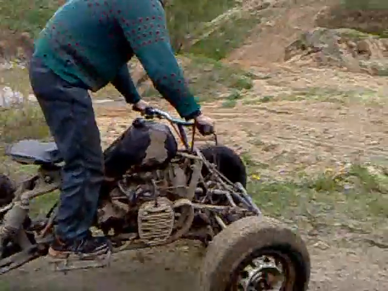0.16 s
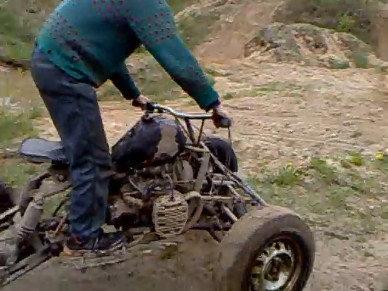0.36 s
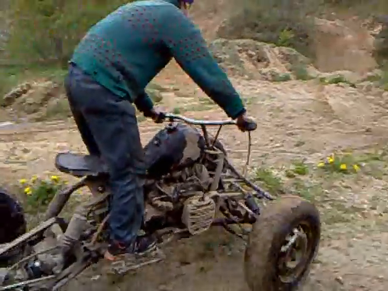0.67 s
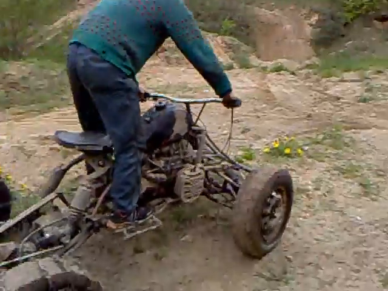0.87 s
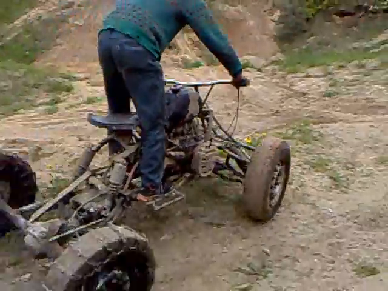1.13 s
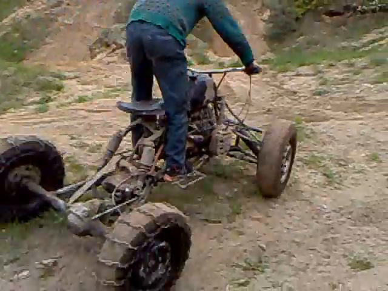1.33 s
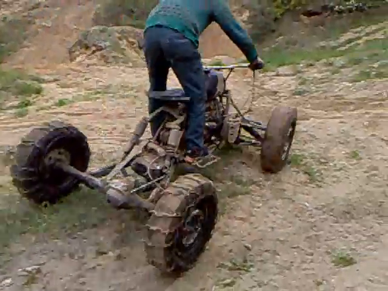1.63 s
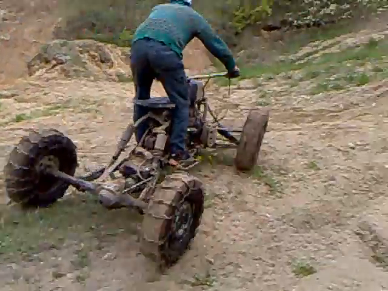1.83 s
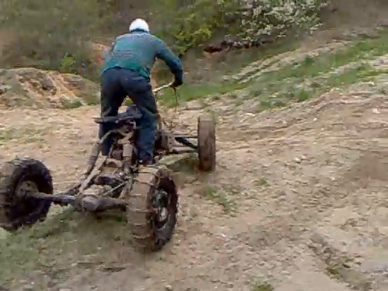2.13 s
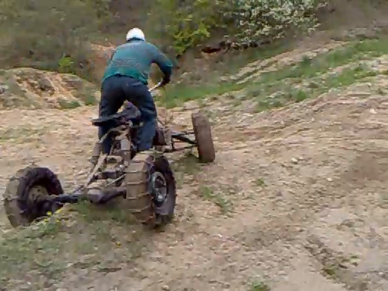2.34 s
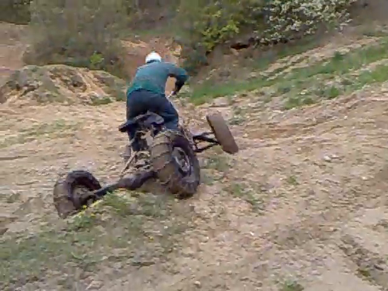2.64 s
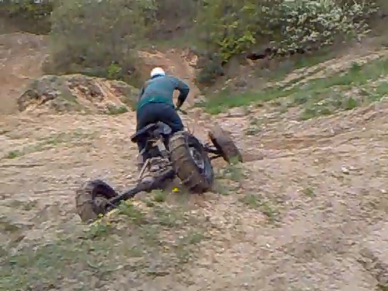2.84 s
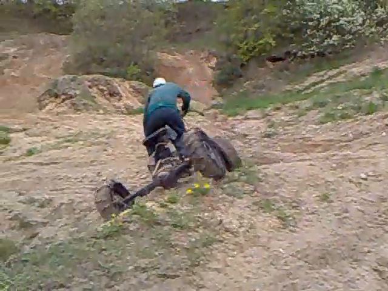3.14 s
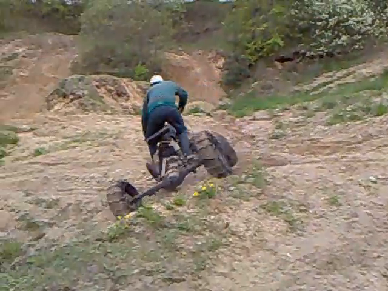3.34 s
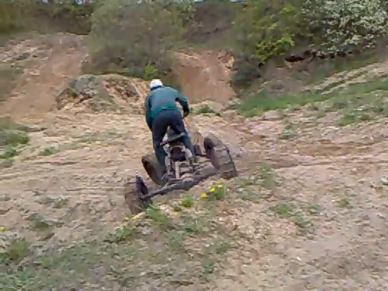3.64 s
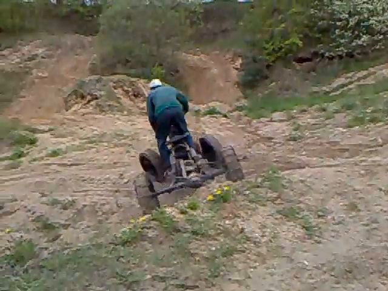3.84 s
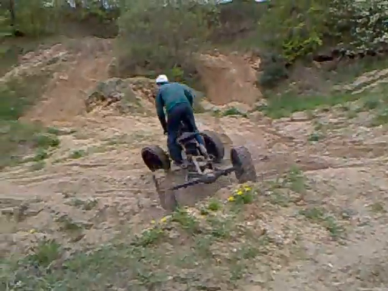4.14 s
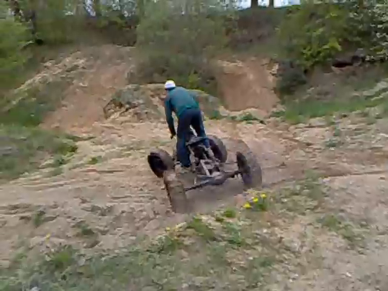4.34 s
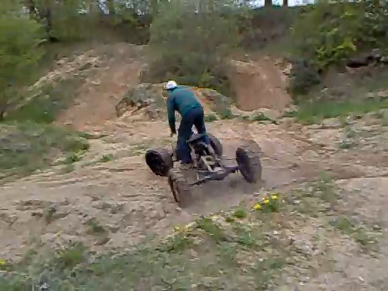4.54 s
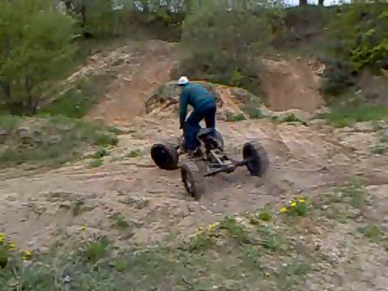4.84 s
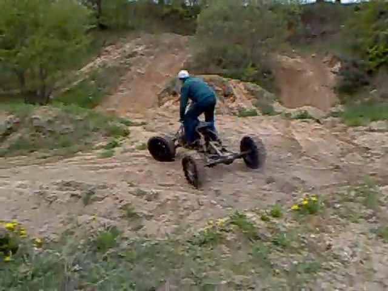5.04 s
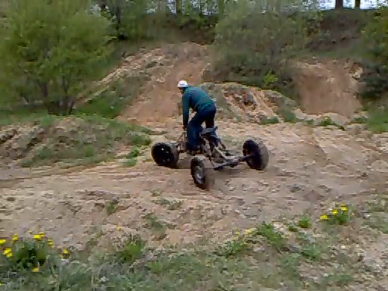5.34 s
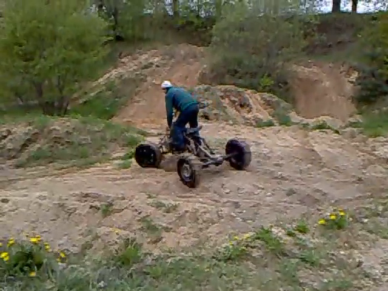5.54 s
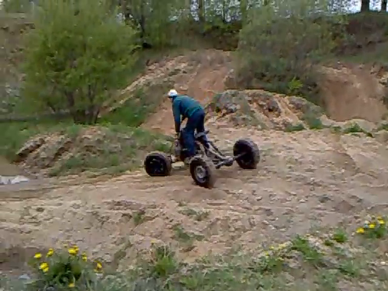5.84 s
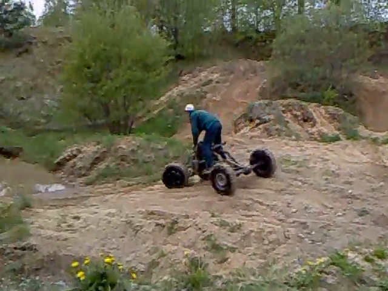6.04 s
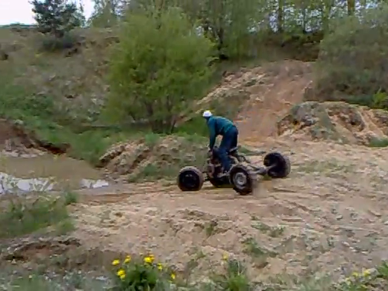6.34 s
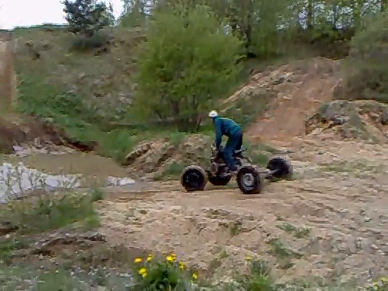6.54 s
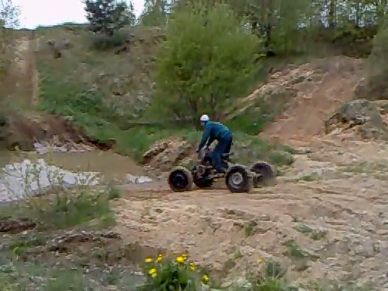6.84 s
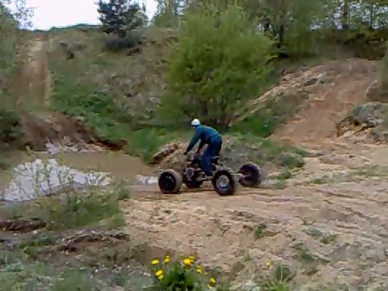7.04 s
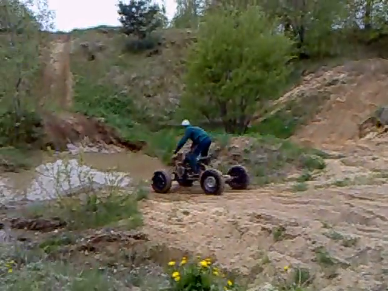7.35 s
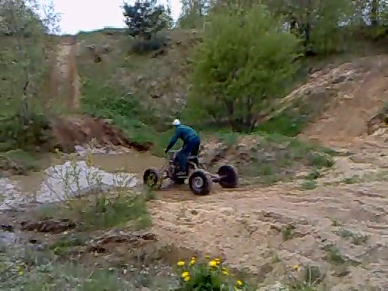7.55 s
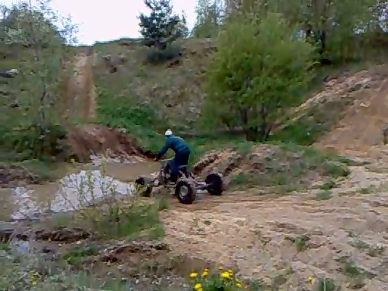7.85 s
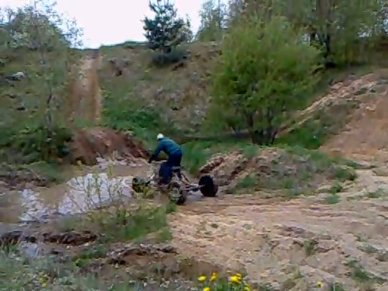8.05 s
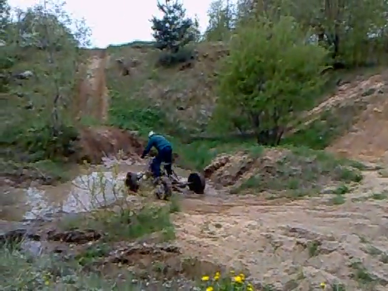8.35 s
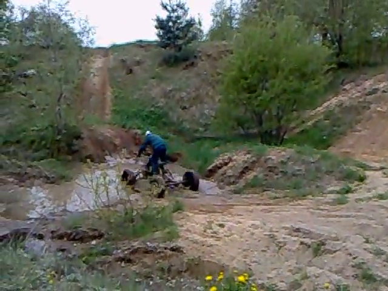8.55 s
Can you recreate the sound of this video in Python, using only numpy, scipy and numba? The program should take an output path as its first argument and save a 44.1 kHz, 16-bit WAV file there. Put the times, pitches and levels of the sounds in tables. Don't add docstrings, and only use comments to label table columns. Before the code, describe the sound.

A small rough twin-cylinder engine drives away across a sand pit. At first it is close: clattering valve gear, hissing intake and low puffing, with the first bark at 0.2 s and a tight volley from 0.35 to 0.6 s. Short, dry, ragged cracks with bassy thumps and hollow pipe ringing continue unevenly, with misfire gaps, until about 2.1 s. A lull around 2.4-2.7 s leaves one weaker pop; then the climb brings irregular, hissy barks from 2.75 to 5.1 s, densest after 4.3 s, with duller puffs between. The engine drops back, sparse and faint, near 5.5-6 s, then picks up into a distant regular run of pops peaking about 6.8 s. After 7 s it slows, leaving isolated cracks near 7.6, 7.9, 8.3 and 8.6 s over faint running noise. Short muffled echoes come from the banks; the small microphone lacks deep bass.

```python
import sys
import numpy as np
from scipy import signal
from scipy.fft import rfft, irfft, next_fast_len
from scipy.io import wavfile
from numba import njit

SR = 44100
rng = np.random.default_rng(int(sys.argv[2]) if len(sys.argv) > 2 else 0)


def dump_mix(stems):
    frames = np.atleast_2d(stems).T
    limited = np.clip(frames, -1, 1)
    pcm = np.round(limited * 32767).astype(np.int16)
    wavfile.write(sys.argv[1], SR, pcm)


def makeup_ratio(level_db):
    decades = np.asarray(level_db, float) / 20
    return 10 ** decades


N = 383229

# (time [s], exhaust strokes [per s])
CRANK_SPEED = [(0, 21), (.3, 18.5), (.6, 26), (.85, 21.5), (1.3, 23), (1.53, 19.6), (1.65, 23), (2, 24.5),
               (2.6, 17), (3, 24), (4, 25), (4.9, 28), (5.9, 15.5), (6.45, 20.5), (6.9, 25.5), (7.6, 18),
               (8.7, 13.5)]
# (time [s], running gear [dB], pumping of dead strokes [dB])
RUNNING_LEVELS = [(0, -38, -43.5), (.22, -43.5, -46), (.55, -41.5, -38), (.9, -42.5, -39.5),
                  (1.3, -44, -41.5), (1.58, -48.5, -45), (2.0, -47.5, -46), (2.42, -54, -51.5),
                  (2.74, -62.5, -63.5), (3.0, -53, -55), (3.5, -56, -52.5), (4.5, -55.5, -51.5),
                  (5.1, -57.5, -56), (5.9, -62.5, -57.5), (6.85, -51, -47.5), (7.38, -60.5, -63),
                  (8.2, -60.5, -60), (8.69, -61.5, -70)]
# (time [s], level of the blow [dB])
TAILPIPE_FACING = [(0, -17), (1.3, -1.5), (2, 3), (3, 5.5), (4, 1.5), (5, 3.5), (6, -6), (7, -6),
                   (8.69, -3.5)]
# (time [s], bark peak
# [dB], bark centre [Hz], pipe ring [dB re bark])
FIRED_STROKES = [(0.205, -6.5, 913, -21), (0.367, -6, 2270, -21), (0.411, 3, 1500, -24),
                 (0.454, -4, 2140, -17.5), (0.495, 1.5, 990, -25), (0.536, -4, 2330, -23),
                 (0.573, -3, 960, -21.5), (0.61, -7, 2200, -17), (0.818, -7, 900, -30),
                 (0.866, -2, 965, -19.5), (0.955, -0.5, 2120, -24), (1.048, -5.5, 960, -26),
                 (1.185, -6, 950, -19), (1.234, -4, 947, -12.5), (1.321, -3.5, 1900, -19),
                 (1.456, -13, 1750, -10.5), (1.607, -3.5, 950, -18), (1.651, -7.5, 2630, -14.5),
                 (1.696, -5.5, 2270, -19), (1.78, -5, 1190, -14.5), (1.823, -5, 1750, -15.5),
                 (1.865, -7.5, 2350, -14), (1.952, -4, 1724, -19), (1.993, -2, 2330, -17.5),
                 (2.034, -3, 1820, -23), (2.115, -2.5, 835, -22.5), (2.35, -12.5, 2170, -18),
                 (2.75, -13, 2190, -21), (2.804, -14, 890, -15), (2.856, -16.5, 1040, -13.5),
            (2.948, -15.5, 990, -23), (2.99, -7.5, 2020, -24), (3.034, -25, 940, -26),
            (3.12, -7.5, 2000, -24), (3.368, -11, 2180, -26), (3.53, -9.5, 2445, -20.5),
            (3.7, -4.5, 2110, -23), (3.831, -21, 1480, -17), (3.872, -16.5, 2230, -18.5),
            (3.997, -31.5, 935, -15), (4.037, -13.5, 2040, -24), (4.153, -19.5, 1320, -16),
            (4.192, -10, 1710, -24), (4.349, -10.5, 2280, -32), (4.424, -7.5, 2100, -31),
            (4.582, -11, 2010, -36), (4.659, -11, 1550, -25), (4.734, -5.5, 2290, -29),
            (4.772, -11, 1060, -26), (4.807, -9.5, 1460, -39), (4.878, -9, 2000, -41),
            (4.95, -8.5, 2550, -32), (5.033, -31, 1880, -22), (5.138, -12.5, 2060, -17),
                 (5.453, -34, 1860, -28), (5.603, -23, 1420, -11.5), (5.846, -26.5, 1520, -16),
               (5.908, -23.5, 1370, -18.5), (6.04, -25, 1540, -17.5), (6.101, -19, 1940, -19),
               (6.154, -18.5, 1940, -20), (6.266, -21.5, 2010, -20), (6.369, -23.5, 940, -30),
               (6.471, -17, 2130, -30), (6.566, -17.5, 2020, -32), (6.653, -15, 2000, -23),
               (6.737, -16, 1990, -16.5), (6.817, -10.5, 2070, -21), (6.897, -16, 2230, -17),
               (6.977, -14.5, 1495, -28), (7.591, -21, 1710, -12), (7.933, -20, 1850, -11),
               (8.321, -24.5, 2050, -12), (8.603, -33, 1520, -14)]
FIRED = FIRED_STROKES
# (time [s], peak [dB])
FAINT_BURSTS = [(1.102, -31), (1.278, -18.5), (1.375, -30), (2.4, -41), (3.196, -33.5), (3.323, -37.5),
                (3.583, -31.5), (3.626, -39), (3.756, -32), (4.242, -31), (4.459, -43), (4.501, -29.5),
                (4.54, -55), (4.925, -26.5), (4.997, -26.5), (5.071, -36.5), (5.107, -32), (5.189, -32),
                (5.233, -33.5), (5.272, -36.5), (5.319, -43), (5.476, -41.5), (7.032, -38), (7.073, -36),
                (7.113, -47), (7.155, -42), (8.038, -38.5), (8.083, -36.5)]
# (frequency [Hz], level [dB per Hz])
JET_COLOUR = [(88, 24.5), (150, 6), (457, -6), (1020, -5.5), (1790, -7.5), (2180, -5.5), (3490, -15.5),
              (4320, -25.5), (5460, -21.5), (7320, -23), (9440, -35.5), (16000, -42.5)]
# (frequency [Hz], level [dB per Hz])
CLATTER_COLOUR = [(120, -18), (200, -6.5), (320, -1), (450, -7), (640, 0), (900, -9), (2000, -8.5),
                  (3200, -12.5), (4200, -23.5), (6000, -39)]
# (frequency [Hz], level [dB per Hz])
INTAKE_COLOUR = [(3000, -43), (4300, -3), (5300, 4), (6500, -5), (7800, -2.5), (9000, -16), (12000, -29),
                 (16000, -35)]
# (frequency [Hz], width [Hz], level [dB])
CASTING_MODES = [(648, 16, -27), (1520., 69, -19.5), (1940., 9, -18)]
# (frequency [Hz], level [dB])
PIPE_OVERTONES = [(325., -10.5), (643., -5), (972., -4), (1310., -14.5), (1600., -10), (1943., -8)]
# (delay [s], level [dB])
PIPE_RETURNS = [(.012, -9), (.021, -10.5)]
# (delay [s], level [dB])
WALL_ECHOES = [
    (0.018, -15.5),
    (.053, -26),
    (.081, -25),
    (.12, -28),
]

SHAKE_S, SHAKE_CLATTER_DB, SHAKE_HUM_DB, SHAKE_PUMP_DB = 0.081, 3.85, 5, 0.27
GEAR_REFERENCE_DB = -48
HUM_DB, HUM_FOLLOWS, INTAKE_DB, INTAKE_FOLLOWS = -58.5, 1.35, -52.5, 1
SIDE_ON = -0.56
THUMP_DB, THUMP_FROM_BARK, THUMP_FROM_PUMP = -4.5, 0.33, 0.41
SLUG_DB, SLUG_S, RING_LAG_S, WALL_BASS_DB = 8, .0052, .0025, -15.5
USUAL_EXCESS_DB = 40
HISS_DB, HISS_PER_EXCESS = -19, -0.37
FALL_MS, FALL_PER_EXCESS, FALL_SCATTER = 3.2, -0.051, .25
DULL_DB = -7 + 15 - 15
STRAY_HZ, STRAY_DB = 1792, -14
NEAR_CENTRE_DB, CENTRE_SPREAD, RESTED_DB, REST_S = 8.5, .1, 8, 0.32
WAVER_DB, RING_SCATTER_DB = 2.5, 1.2
PIT_T60_S, PIT_DB = 0.93, -27.5


def rms_one(x):
    return x / np.sqrt(np.mean(x ** 2) + 1e-20)


def in_time(rows):
    s, *columns = np.transpose(rows)
    return [np.interp(np.arange(N) / SR, s, c) for c in columns]


def drift(rate):
    count = int(N / SR * rate) + 2
    return np.interp(np.arange(N), np.linspace(0, N, count), rng.standard_normal(count))


def coloured(x, spectrum):
    hz, db = np.transpose(spectrum)
    size = next_fast_len(len(x))
    grid = np.maximum(np.fft.rfftfreq(size, 1 / SR), 1)
    gain = makeup_ratio(np.interp(np.log(grid), np.log(hz), db))
    return rms_one(irfft(rfft(x, size) * gain, size)[:len(x)])


def cut(x, hz, kind, order=2):
    return signal.sosfilt(signal.butter(order, hz, kind, fs=SR, output="sos"), x)


def ring(clicks, hz, t60):
    r, w = makeup_ratio(-60 / (t60 * SR)), 2 * np.pi * hz / SR
    return signal.lfilter([0, np.sin(w)], [1, -2 * r * np.cos(w), r * r], clicks + 1e-18)


def clicks_at(seconds, sizes):
    out = np.zeros(N)
    out[np.clip((seconds * SR).astype(int), 0, N - 1)] = sizes
    return out


@njit
def gliding(x, turn):
    out, state = np.zeros(len(x)), 0j
    for i in range(len(x)):
        state = state * turn[i] + x[i]
        out[i] = state.real
    return out


def crank(lead_s):
    turned = np.cumsum(in_time(CRANK_SPEED)[0]) / SR
    fired_at = turned[((np.array(FIRED)[:, 0] - lead_s) * SR).astype(int)]
    whole = np.cumsum(np.r_[5, np.maximum(np.round(np.diff(fired_at)), 1)])
    known = np.r_[fired_at[0] - 5, fired_at, fired_at[-1] + 5]
    return np.interp(turned, known, np.r_[0, whole, whole[-1] + 5])


def shaking():
    r = np.exp(-1 / (SHAKE_S * SR))
    return signal.lfilter([1], [1, -r], clicks_at(np.transpose(FIRED)[0], 1))


def gas_bounce(strokes, open_hz=54.0, shut_hz=118.3, rise=0.38, t60=0.23):
    part = strokes % 1
    warmth = 1 + .06 * rng.standard_normal(400)[strokes.astype(int)]
    hz = warmth * (shut_hz - (shut_hz - open_hz) * np.exp(-part / rise))
    loss = 1 + 12 * part ** 12
    return makeup_ratio(-60 * loss / (t60 * SR)) * np.exp(2j * np.pi * hz / SR)


def valve_push(clicks):
    push = np.hanning(round(0.0067 * SR)) * 2 / round(0.0049 * SR)
    return np.convolve(clicks, push)[:N]


def dead_pumping(strokes, pump_db, bounce):
    opens = np.diff(np.floor(strokes), prepend=0) > 0
    shuts = np.diff(np.floor(strokes + .45), prepend=0) > 0
    dead = (opens - 0.66 * shuts) * makeup_ratio(pump_db + 14.5 + 2.0 * rng.standard_normal(N))
    return cut(cut(gliding(valve_push(dead), bounce), 140.0, "low"), 32.0, "high")


def clatter(strokes, level_db, hiss_db, ticks=2, pulse=0.23, knocks_per_s=520.0, knock_db=-8.0):
    swell = 1 - pulse + pulse * 1.2 * np.exp(-(strokes * ticks % 1) / 0.18)
    sizes = makeup_ratio(1.8 * np.minimum(rng.exponential(1, N), 4)) * rng.choice([-1, 1], N)
    knocks = rms_one(sizes * (rng.random(N) < knocks_per_s * swell / SR))
    grit = swell * rng.standard_normal(N) + makeup_ratio(knock_db) * knocks
    body = coloured(grit * makeup_ratio(3.15 * drift(120)), CLATTER_COLOUR)
    for hz, width, db in CASTING_MODES:
        flutter_db = 3 * drift(40)
        body = body + makeup_ratio(db + flutter_db) * rms_one(ring(grit, hz, 10.0 / width))
    hiss = coloured(swell ** 3.1 * rng.standard_normal(N), INTAKE_COLOUR)
    edges = [2500, 4700, 6000, 7200, 9000, 16000]
    hiss = sum(makeup_ratio(2 * drift(25)) * cut(hiss, pair, "band") for pair in zip(edges, edges[1:]))
    body = body / np.std(cut(body, [900, 4000], "band"))
    return makeup_ratio(level_db) * body + makeup_ratio(hiss_db + 1.0 * drift(30)) * hiss


def frame_hum(strokes, hum_db, hz=320.5):
    shake = rng.standard_normal(N) * (.6 + np.exp(-(strokes % 1) / .5))
    bent = hz * (1 + .03 * drift(12))
    turn = makeup_ratio(-60 / (.2 * SR)) * np.exp(2j * np.pi * bent / SR)
    hum = cut(gliding(shake, turn), [hz / 1.3, hz * 1.3], "band", order=1)
    return makeup_ratio(hum_db + 0.5) * rms_one(hum)


def fired_thump(pump_db, facing_db, bounce):
    s, bark_db = np.transpose(FIRED)[:2]
    low_db = THUMP_DB + THUMP_FROM_BARK * bark_db + THUMP_FROM_PUMP * pump_db[(s * SR).astype(int)]
    fired = clicks_at(s + 0.00019, makeup_ratio(low_db + 3.0))
    slug = np.convolve(fired, np.hanning(round(SLUG_S * SR)))[:N]
    slug = slug + sum(makeup_ratio(db) * np.roll(slug, round(lag * SR)) for lag, db in PIPE_RETURNS)
    front = makeup_ratio(SLUG_DB + facing_db) * cut(slug, 40., "high", order=1)
    ringing = gliding(np.roll(valve_push(fired), round(RING_LAG_S * SR)), bounce)
    blow = cut(makeup_ratio(-0.5) * cut(ringing, 170.0, "low"), 55.0, "high") + front
    lag = round(WALL_ECHOES[1][0] * SR)
    blow[lag:] += makeup_ratio(WALL_BASS_DB) * blow[:-lag].copy()
    return cut(blow, 32.0, "high")


def barks(facing_db, gear_db, tail_s=0.013, tail_db=-15.0, shrill_db=-5.5, ragged_db=2.0):
    size = 4096
    out = np.zeros(N + size)
    t = np.arange(size) / SR - .008
    after = np.maximum(t, 0)
    rise_s, shrill_s = .0013, .009
    jet = coloured(rng.standard_normal(N + size), JET_COLOUR)
    dull = cut(jet, [280., 600.], "band")
    body = cut(cut(jet, 523.0, "high"), 3740, "low", order=4)
    hiss = cut(jet, 4230, "high", order=4)
    lumps = makeup_ratio(ragged_db * drift(450))
    bursts = FIRED + [(s, peak_db, 2000., 0) for s, peak_db in FAINT_BURSTS]
    luck = rng.standard_normal((len(bursts), 3))
    for (s, peak_db, hz, _), (hissy, slow, stray) in zip(bursts, luck):
        i = round((s - .006) * SR)
        here = slice(i, i + size)
        excess = np.clip(peak_db - gear_db[i] - USUAL_EXCESS_DB, -10, 10)
        hiss_db = HISS_DB + HISS_PER_EXCESS * excess + 1.65 * hissy
        fall_ms = FALL_MS * np.exp(FALL_PER_EXCESS * excess + FALL_SCATTER * slow)
        fall = np.exp(-after * 1000 / max(fall_ms, .5)) + makeup_ratio(tail_db) * np.exp(-after / tail_s)
        ragged = np.resize(lumps[here], size) ** np.minimum(after / 0.01, 1)
        shape = np.exp(np.minimum(t, 0) / rise_s) * fall * ragged
        dull_gain = makeup_ratio(DULL_DB + 0.3 * facing_db[i])
        burst = shape * (dull_gain * dull[here] + body[here] + makeup_ratio(hiss_db + 20.5) * hiss[here])
        shrill = ring(shape * rng.standard_normal(size), hz, shrill_s)
        stray_hz = STRAY_HZ * 2 ** (stray / 3)
        shrill += makeup_ratio(STRAY_DB) * ring(shape * jet[here][::-1] * 3, stray_hz, shrill_s * 1.7)
        shrill_gain = makeup_ratio(shrill_db + .6 * facing_db[i] + 3.5)
        burst += shrill_gain * shrill * np.std(burst) / np.std(shrill)
        out[here] += makeup_ratio(peak_db) * burst / np.abs(burst).max()
    return out[:N]


def pipe_rings(facing_db, t60=0.14, swell_s=0.001, detune=0.023):
    out, t = np.zeros(N + 8192), np.arange(6144) / SR
    waver = makeup_ratio(WAVER_DB * drift(120))
    hz, db = np.transpose(PIPE_OVERTONES)
    rests = np.diff(np.transpose(FIRED)[0], prepend=0)
    luck = rng.standard_normal((len(FIRED), 2, len(hz)))
    dying = makeup_ratio(-60 * t[:, None] / (t60 * (640 / hz) ** .5))
    swell = 1 - np.exp(-t / swell_s)
    for (s, bark_db, centre, ring_db), rest, (loud, warm) in zip(FIRED, rests, luck):
        nearness = np.exp(-(np.log(hz / centre) / CENTRE_SPREAD) ** 2)
        level = bark_db + ring_db + db + RING_SCATTER_DB * loud + NEAR_CENTRE_DB * nearness
        rested = min(rest / REST_S, 1)
        level[0] += SIDE_ON * facing_db[int(s * SR)]
        level[1] += RESTED_DB * rested
        level[2] -= RESTED_DB * rested ** 2
        tones = dying * np.sin(2 * np.pi * t[:, None] * hz * (1 + detune * warm))
        i = round((s + 0.001836) * SR)
        out[i:i + len(t)] += swell * (tones @ makeup_ratio(level))
    return waver * out[:N]


def pit(x):
    t = np.arange(SR // 2) / SR
    reply = makeup_ratio(PIT_DB) * makeup_ratio(-60 * t / PIT_T60_S) * (t > .01) * rng.standard_normal(len(t)) / 40
    for lag, db in WALL_ECHOES:
        smear = rng.standard_normal(len(t)) * np.exp(-((t - lag) / 0.0011) ** 2)
        reply += makeup_ratio(db) * smear / np.sqrt(np.sum(smear ** 2))
    return cut(signal.fftconvolve(x, reply)[:N], 2500.0, "low", order=1)


def scene():
    strokes, shake = crank(lead_s=0.0044), shaking()
    gear_db, pump_db = in_time(RUNNING_LEVELS)
    facing_db, = in_time(TAILPIPE_FACING)
    swing = gear_db - GEAR_REFERENCE_DB
    pump_db = pump_db + SHAKE_PUMP_DB * shake
    clatter_db = gear_db + SHAKE_CLATTER_DB * shake
    intake_db = INTAKE_DB + INTAKE_FOLLOWS * swing + SHAKE_CLATTER_DB * shake
    hum_db = HUM_DB + HUM_FOLLOWS * swing + SHAKE_HUM_DB * shake + SIDE_ON * facing_db
    bounce = gas_bounce(strokes)
    low = dead_pumping(strokes, pump_db, bounce) + fired_thump(pump_db, facing_db, bounce)
    gear = clatter(strokes, clatter_db, intake_db) + frame_hum(strokes, hum_db)
    bark = barks(facing_db, gear_db) + pipe_rings(facing_db)
    return (low + gear + bark + pit(bark))[None]


def roll_off(x):
    return signal.sosfilt(signal.butter(12, 16480, fs=SR, output="sos"), x)


def record(dry):
    rounded = cut(0.78 * np.tanh(dry / 0.81), 48.0, "high")
    mix = cut(rounded, 15700, "low", order=14)
    return roll_off(mix)


dry = scene()
out = record(dry)
dump_mix(out)
```